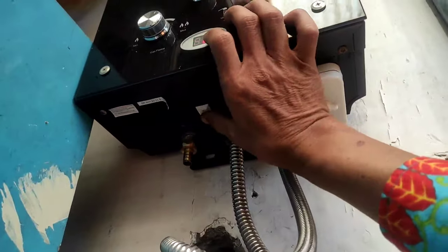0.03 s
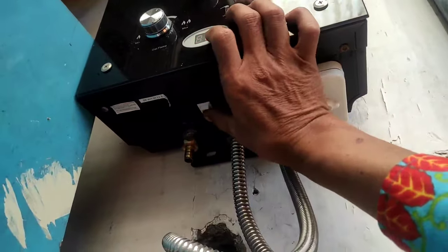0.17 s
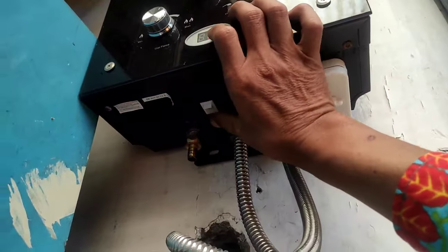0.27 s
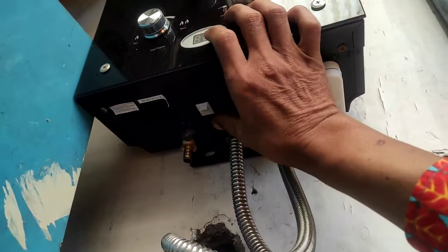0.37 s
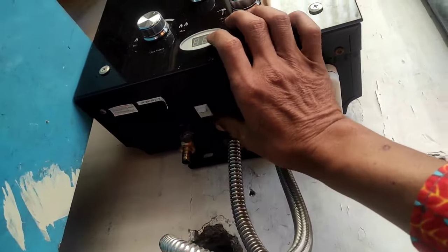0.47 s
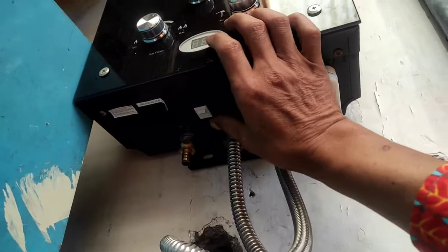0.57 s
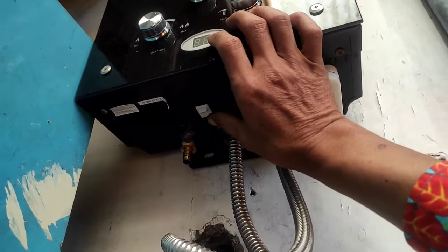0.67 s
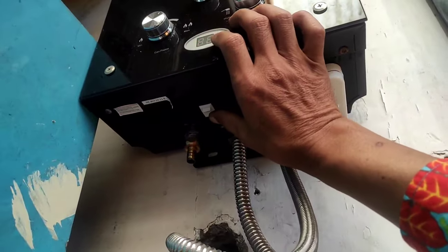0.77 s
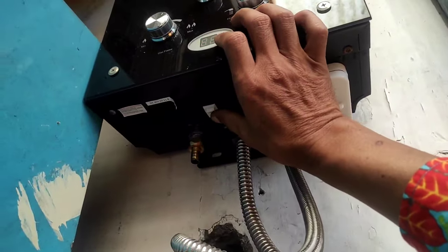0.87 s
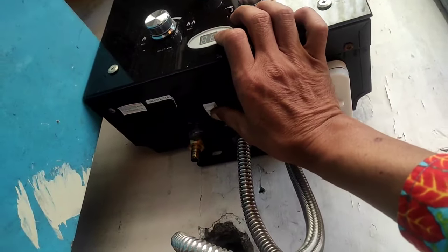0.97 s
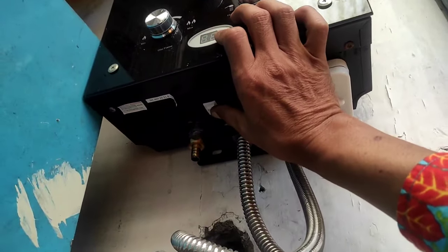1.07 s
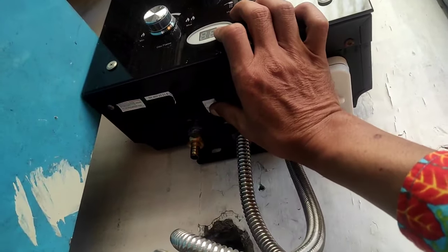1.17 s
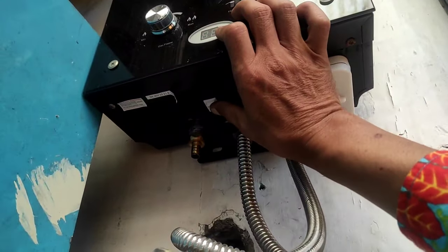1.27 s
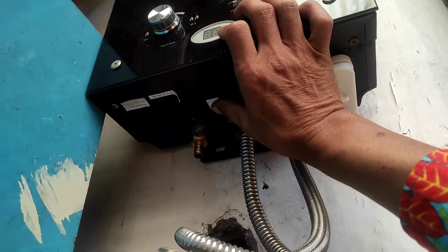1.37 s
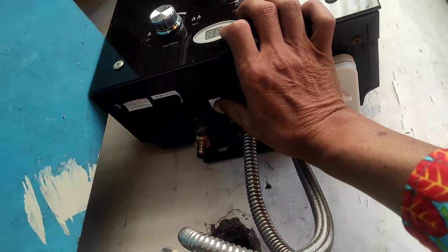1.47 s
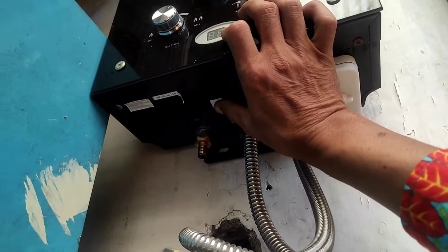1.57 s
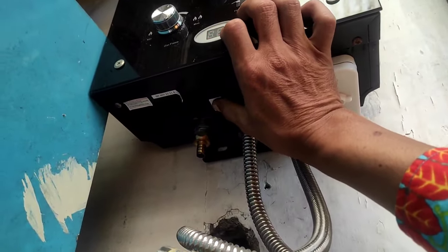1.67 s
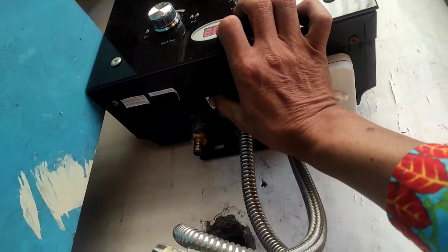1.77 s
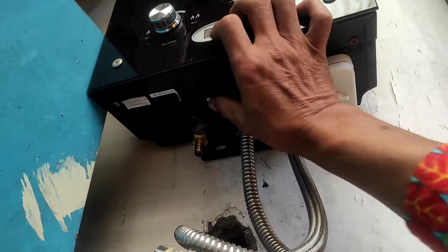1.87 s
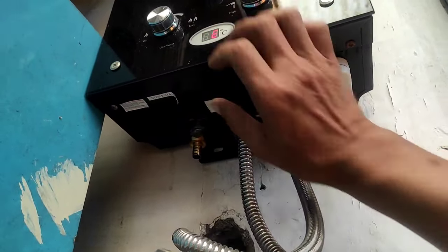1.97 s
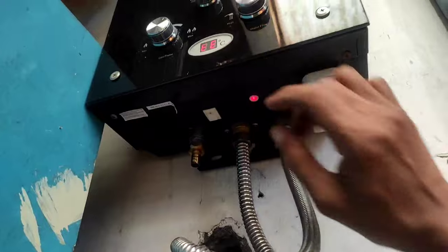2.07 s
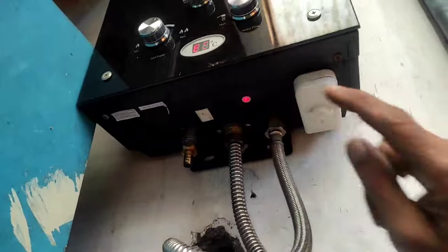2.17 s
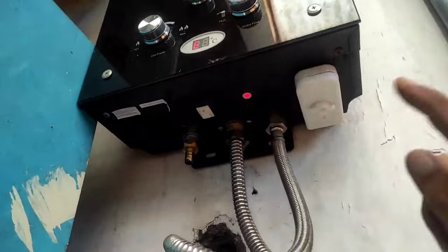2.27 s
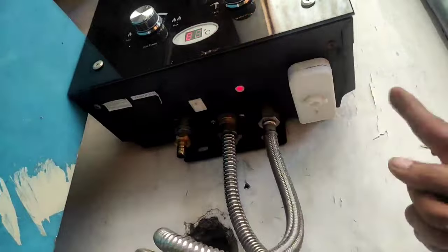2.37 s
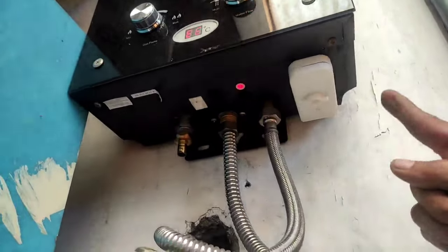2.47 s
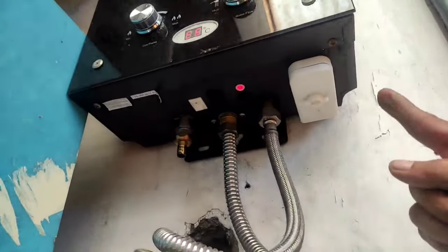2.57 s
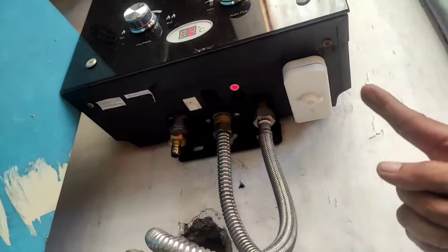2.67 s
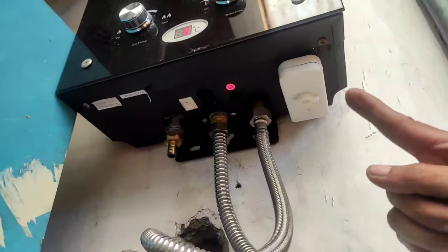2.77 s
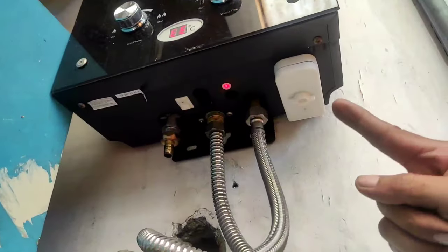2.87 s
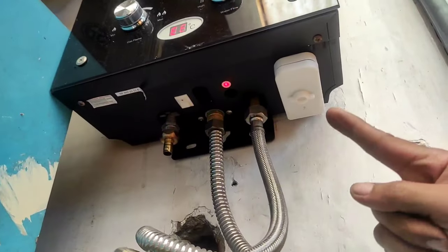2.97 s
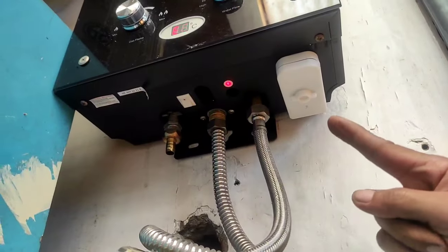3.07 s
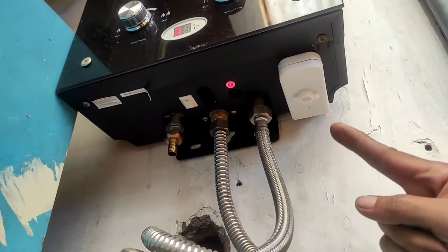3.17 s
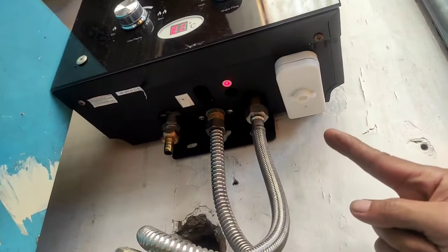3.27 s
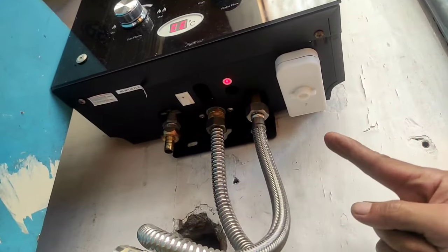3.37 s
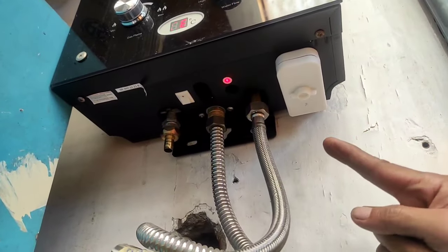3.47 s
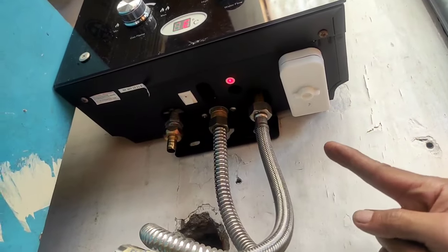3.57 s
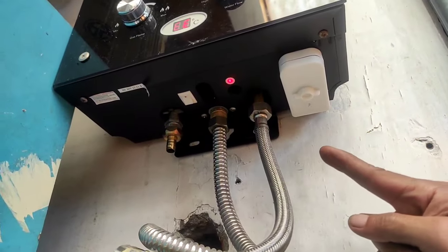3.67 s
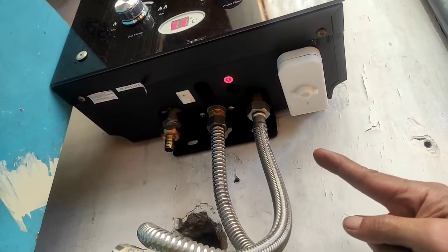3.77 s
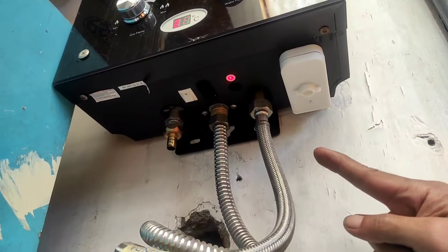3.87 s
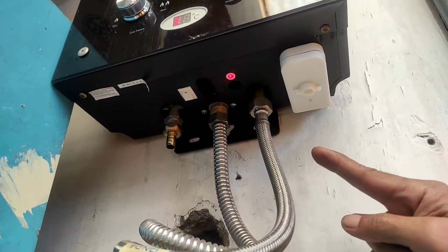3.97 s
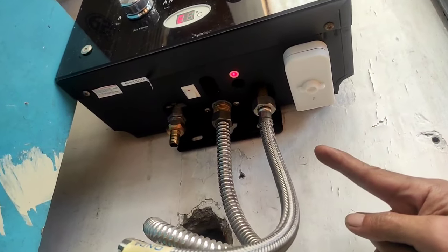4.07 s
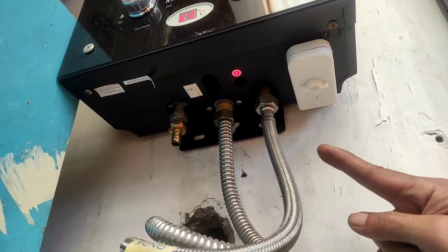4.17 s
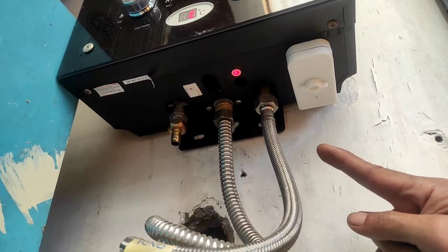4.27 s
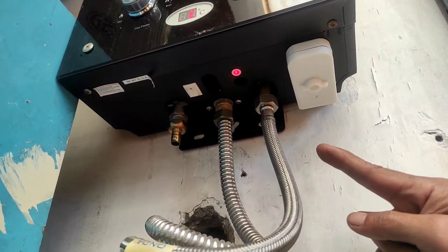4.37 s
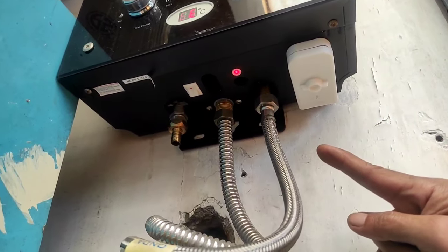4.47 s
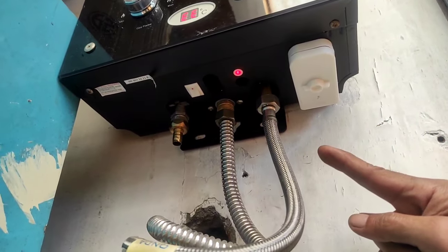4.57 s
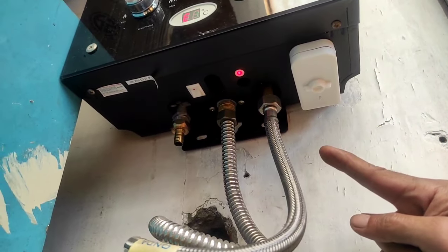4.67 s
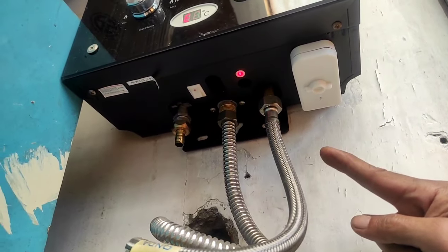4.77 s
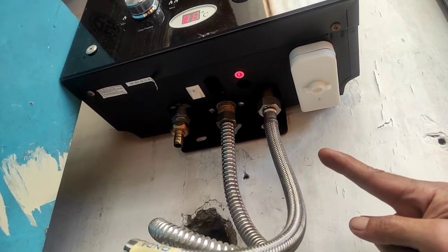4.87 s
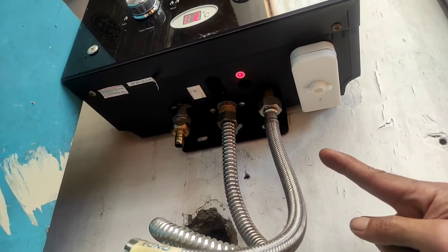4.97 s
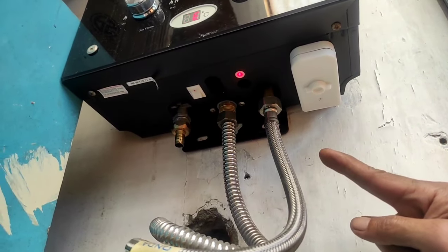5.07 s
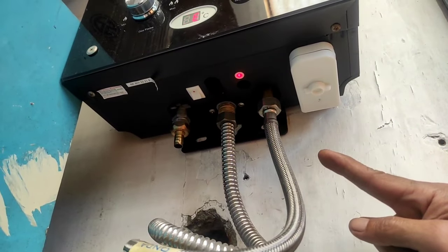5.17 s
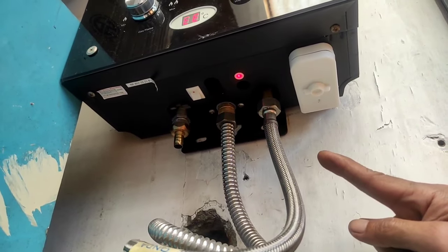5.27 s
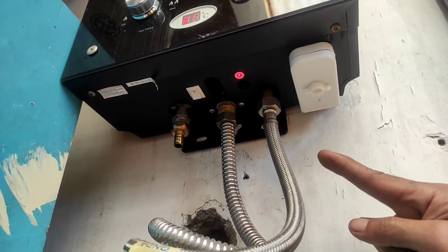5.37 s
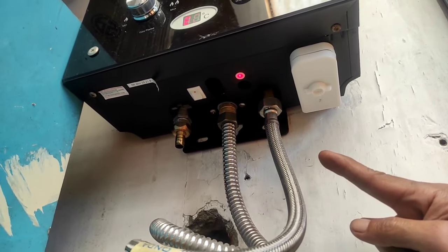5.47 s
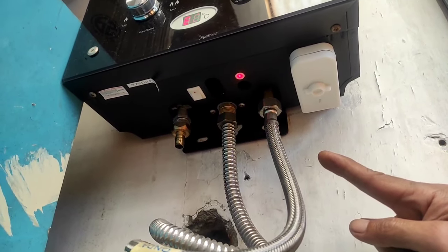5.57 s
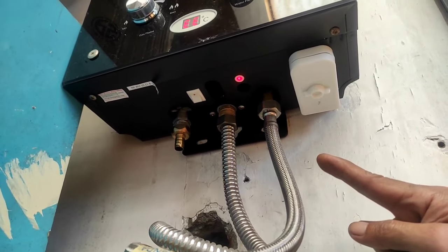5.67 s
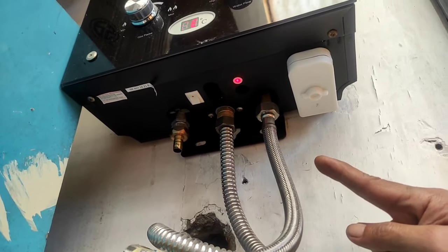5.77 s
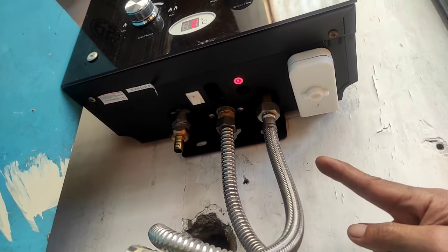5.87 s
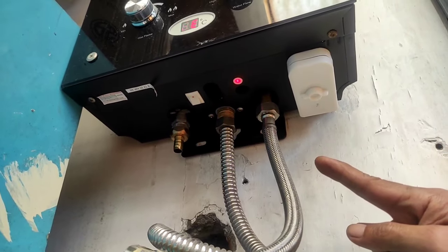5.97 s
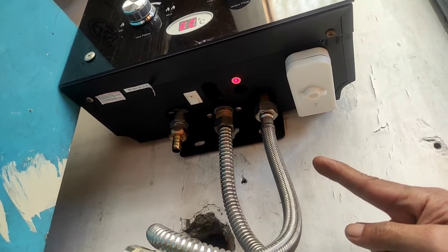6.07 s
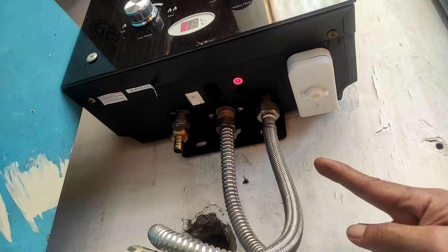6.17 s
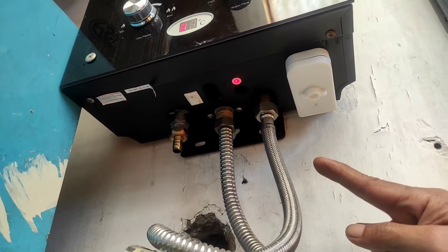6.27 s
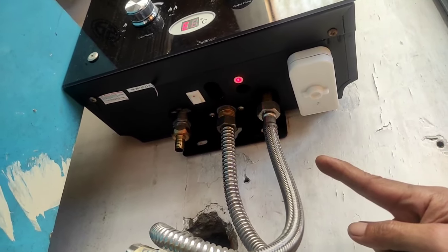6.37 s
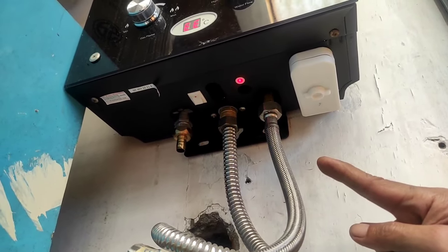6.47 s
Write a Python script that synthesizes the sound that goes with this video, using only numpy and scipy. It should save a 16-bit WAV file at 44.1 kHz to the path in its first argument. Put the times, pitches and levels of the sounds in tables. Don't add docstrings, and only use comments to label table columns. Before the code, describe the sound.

An indoor workshop hums low, with a deep distant machinery rumble strongest at the start and easing by about 1.2 seconds, and a steady airy hiss with faint duct tones. At 0.06 seconds a rocker switch snaps off, loud and close, with a tiny bounce and short room tail. Only the background remains until 1.69, when the switch clacks on with a double contact. From 1.74, igniter sparks tick about fourteen times a second: dry, bright, nearly identical snaps with a short high steel ring. At 2.2 a solenoid valve clacks hard and metallic; the next spark is weaker and the ticking slows to about ten a second until 2.7. It then regains its fast, even pace and continues to the end at about 6.5, with no ignition. The close hand-held stereo microphone adds a slight high, whistly edge, and rumble swells a little near 6.1.

```python
import sys
import numpy as np
from scipy import signal
from scipy.fft import rfft, irfft, next_fast_len
from scipy.io import wavfile
from scipy.ndimage import map_coordinates

SR = 44100
rng = np.random.default_rng(int(sys.argv[2]) if len(sys.argv) > 2 else 0)


def unload_audio(sound):
    columns = np.transpose(np.atleast_2d(sound))
    steps = np.round(np.clip(columns, -1, 1) * 32767)
    wavfile.write(sys.argv[1], SR, steps.astype(np.int16))


def volts_from_decibels(level):
    exponent = np.asarray(level, float) / 20
    return 10 ** exponent


N = 287973


def unit(x):
    return x / np.sqrt(np.mean(x ** 2) + 1e-20)


def along(points, hz):
    f, v = np.transpose(points)
    return np.interp(np.log(hz + 1), np.log(f + 1), v)


def filtered(x, response):
    size = next_fast_len(N + SR // 2)
    hz = np.fft.rfftfreq(size, 1 / SR)
    return irfft(rfft(x, size) * response(hz), size)[..., :N]


def coloured(x, spectrum):
    size = 2048
    level_db = np.maximum(along(spectrum, np.fft.rfftfreq(size, 1 / SR)), -70)
    cepstrum = irfft(np.log(volts_from_decibels(level_db)))
    fold = np.r_[1, np.full(size // 2 - 1, 2), 1, np.zeros(size // 2 - 1)]
    kernel = irfft(np.exp(rfft(cepstrum * fold)))
    kernel = kernel / np.linalg.norm(kernel)
    return signal.fftconvolve(x, kernel[None], axes=1)[:, :x.shape[1]]


def peaks(modes):
    return lambda f: np.sqrt(sum(volts_from_decibels(2 * db) / (1 + (2 * (f - c) / w) ** 2) ** 2 for c, w, db in modes))


def fade(t, t60, rise):
    t = np.maximum(t, 0)
    return volts_from_decibels(-60 * t / t60) * (1 - np.exp(-t / abs(rise)))


def direct(t, delay, db):
    return volts_from_decibels(db) * np.exp(-((t - delay) * SR / .7) ** 2)


def stereo_gain(db, balance_db):
    return volts_from_decibels(db + balance_db * np.array([[.5], [-.5]]))


def add(track, sound, s):
    part = track[:, round(s * SR):][:, :sound.shape[1]]
    part += sound[:, :part.shape[1]]


def wobble(rate):
    return map_coordinates(rng.standard_normal(40), [np.arange(N) * rate / SR], mode="mirror")


# (frequency [Hz], left-right likeness [0-1])
LIKENESS = [(60, 0.98), (180, 0.95), (550, 0.55), (1650, 0.13), (4970, 0.014), (15000, 0.08)]


def wash(gain):
    def mid_side(hz):
        turn = np.arccos(np.clip(along(LIKENESS, hz), -1, 1)) / 2
        return gain(hz) * np.array([np.cos(turn), np.sin(turn)])

    mid, side = filtered(rng.standard_normal((2, N)), mid_side)
    return unit(np.array([mid + side, mid - side]))


# (time [s], level [dB])
RUMBLE_SWELL = [(0, 7), (.3, 5.5), (1.2, -1), (2.5, -1), (5.2, -0.5), (6.15, 1), (6.53, -1)]


def swell_db():
    return np.interp(np.arange(N) / SR, *np.transpose(RUMBLE_SWELL))


# (frequency [Hz], width [Hz], level [dB])
ROOM_MODES = [(147.5, 18.7, 0), (178.7, 26, -2), (216, 23, -9.5), (246.3, 34, -15), (351.4, 97, -21)]


def drone(load_db):
    level_db = -43 + 0.13 * load_db + .5 * wobble(2.51)
    return volts_from_decibels(level_db) * wash(peaks(ROOM_MODES))


# (frequency [Hz], width [Hz], level [dB])
RUMBLE_MODES = [(27, 53, -7), (57, 39, -7.5), (96, 74, -5.5)]


def rumble(load_db):
    level_db = -48 + load_db + 1.2 * wobble(2.31)
    return volts_from_decibels(level_db) * wash(peaks(RUMBLE_MODES))


# (frequency [Hz], level per Hz [dB])
AIR_COLOUR = [(150, -26), (260, -2.5), (400, -8), (800, -10.5), (2400, -9), (4300, -20), (5500, -21),
              (6600, -20.5), (7750, -7), (9200, -22.5), (10000, -28), (10700, -36.5), (15000, -37),
              (15500, -70)]
# (frequency [Hz], width [Hz], level [dB])
DUCT_MODES = [(780, 15, 8.5), (1014, 170, -1), (1106.4, 32, 9), (1584, 43, -10.5)]


def air(load_db):
    level_db = -46.5 + 0.12 * load_db + .3 * wobble(1.76)
    hiss = wash(lambda hz: volts_from_decibels(along(AIR_COLOUR, hz)) * (1 + 0.96 * peaks(DUCT_MODES)(hz)))
    return volts_from_decibels(2.5) * volts_from_decibels(level_db) * hiss


def shop():
    load_db = swell_db()
    return drone(load_db) + rumble(load_db) + air(load_db)


# (time [s], peak level [dB], left-right difference [dB])
CLICK_EVENTS = [
    (0.061, -1, 0),
    (1.687, 0, 2.5),
    (2.198, -5, 4),
]
# (delay [s], level [dB])
BOUNCES = [
    [(.006, -4), (.011, -10)],
    [(.011, -4), (.019, 3)],
    [(.003, 15.5), (.007, -15)],
]
# (frequency [Hz], level per Hz [dB])
CRACK_COLOURS = [
    [(120, -40), (200, 0.5), (570, -41), (1110, 6.5), (1540, -19), (2820, -7), (3650, -27), (4560, -9),
     (7210, 4), (9330, -11), (10800, -23), (16200, -39)],
    [(120, -21), (200, -9), (550, -24.5), (1090, -10), (1600, -35), (2140, -16), (4230, -34), (7480, 4),
     (8990, -7.5), (11000, -32), (15100, -30), (16200, -53)],
    [(120, -55), (200, -20), (698, -29), (1190, -18), (2030, 3), (2980, 1), (3790, -18), (4900, -3.5),
     (6580, -1), (8670, -0.5), (13700, -27), (16200, -61)],
]
# (frequency [Hz], level per Hz [dB])
TAIL_COLOURS = [
    [(120, -27), (200, -21), (335, 7), (449, -23), (530, 0), (592, 0), (3790, -5), (7210, 2),
     (10000, -12.5), (10600, -38), (15100, -29), (16200, -75)],
    [(120, -40), (200, -25), (360, 4.5), (570, -14), (839, -5), (3270, -16), (4230, -11), (7760, -6.5),
     (8990, 0.5), (10200, -60), (14800, -35), (16200, -67)],
    [(120, -49), (200, -18), (972, -12.5), (2220, 0.5), (3330, -6), (4230, -21), (4470, -17), (6110, -7),
     (9160, -15), (10800, -28), (14200, -19), (16200, -89)],
]
# (frequency [Hz], level [dB], t60 [s])
PANEL_MODES = [
    [(332.4, -2.5, 0.19), (1132, -1, 0.23), (2767, -24, 0.42), (3020, -13, 0.18), (3208, -31, 1.0)],
    [(317, 1, 0.28), (1130, -0.5, 0.13), (1970, -44, 4.6), (3208, -5.5, 0.15), (3470, -40, 5.0)],
    [(1530, -11.5, 0.38), (2140, -9, 0.45), (3090, -10.5, 0.35), (2960, -5, 0.18), (6080, 3.5, 0.14),
     (6300, -16, 0.27), (6500, -23, 0.29), (6850, -23, 0.47)],
]
# (crack t60 [s], tail level [dB], tail t60 [s], panel level [dB])
CLICK_BODIES = [
    (0.046, -17.5, 0.27, -24),
    (0.095, -18, 0.28, -26),
    (0.078, -13, 0.36, -14.5),
]


def clicks():
    out = np.zeros((2, N))
    t = np.arange(SR // 2) / SR
    rows = zip(CLICK_EVENTS, BOUNCES, CRACK_COLOURS, TAIL_COLOURS, PANEL_MODES, CLICK_BODIES)
    for (s, db, balance_db), bounces, crack_colour, tail_colour, modes, body in rows:
        crack_t60, tail_db, tail_t60, panel_db = body
        noise = wash(np.ones_like)
        crack_noise, tail_noise = noise[:, :len(t)], noise[:, len(t):2 * len(t)]
        blows = volts_from_decibels(2.5) * fade(t, crack_t60, 0.00044)
        for delay, bounce_db in bounces:
            blows = blows + volts_from_decibels(bounce_db) * fade(t - delay, 0.011, 0.0026)
        crack = blows * crack_noise + direct(t, 0.001014, 9)
        sound = volts_from_decibels(-8.0) * coloured(crack, crack_colour)
        sound += volts_from_decibels(tail_db) * coloured(fade(t, tail_t60, 0.0063) * tail_noise, tail_colour)
        for hz, level_db, t60 in modes:
            phase = rng.uniform(0, 2 * np.pi) + rng.normal(0, 1.0, (2, 1))
            ring = fade(t, t60, 0.0047) * np.sin(2 * np.pi * hz * t + phase)
            sound += volts_from_decibels(panel_db + level_db) * ring
        add(out, stereo_gain(db, balance_db) * sound, s)
    return out


# (first spark [s], gap [s], number of sparks)
SPARK_RUNS = [
    (1.7439, .07102, 7),
    (2.2598, .0972, 1),
    (2.357, .09803, 4),
    (2.7344, .07125, 18),
    (4.0169, .07107, 36),
]
# (time [s], width [s], level [dB])
SUPPLY_DIP = (2.26, 0.041, -5)
# (time [s], level [dB], left-right difference [dB])
HAND_SHADE = [(1.74, -2.5, 2.5), (2.1, -1.8, 1), (2.36, -0.6, 0.5), (3.1, -0.4, .1), (4.6, -1.1, -0.5),
              (6.5, -0.74, 0.8)]


def sparks():
    s = np.concatenate([first + gap * np.arange(count) for first, gap, count in SPARK_RUNS])
    luck = rng.standard_normal((len(s), 4))
    at, shade_db, balance_db = np.transpose(HAND_SHADE)
    dip_s, dip_width_s, dip_depth_db = SUPPLY_DIP
    dip_db = dip_depth_db * np.exp(-((s - dip_s) / dip_width_s) ** 2)
    scatter_db = 0.43 * luck[:, 0]
    db = -15 + np.interp(s, at, shade_db) + dip_db + scatter_db
    low_db = -19.5 - 2 * (luck[:, 1] ** 2 + luck[:, 2] ** 2) / 2
    jitter_s = .0002 * luck[:, 3]
    return zip(s + jitter_s, db, low_db, np.interp(s, at, balance_db))


# (frequency [Hz], level [dB])
STEEL_MODES = [(6019, -62), (6368, -61), (6578, -59), (6831, -57), (7144, -55), (7284, -56), (7607, -48),
               (7833, -57), (8043, -57), (8269, -52), (8463, -50), (8802, -51), (9238, -54), (9421, -57)]


def casing_ring(t, late):
    hz, mode_db = np.transpose(STEEL_MODES)[:, :, None, None]
    phase = rng.uniform(0, 2 * np.pi, (len(STEEL_MODES), 2, 1))
    ring = np.sum(volts_from_decibels(mode_db - mode_db.max()) * np.sin(2 * np.pi * hz * t + phase), axis=0)
    return volts_from_decibels(-9.5) * ring * fade(late, .075, 0.00089)


# (frequency [Hz], level per Hz [dB])
SNAP_COLOUR = [(880, -19), (1500, -23), (2650, -14), (3170, -62.5), (4220, -18.5), (4570, -15.5),
               (7020, -2.5), (7450, -1.5), (8570, 7), (9850, -7.5), (10300, -11), (14800, -15),
               (16300, -33), (16800, -55)]
# (frequency [Hz], level per Hz [dB])
ANSWER_COLOUR = [(880, -40.5), (1500, 6), (1640, -32), (2280, -2.5), (3010, -1), (5050, -7.5), (5310, -6),
                 (7300, 4.5), (8570, 7), (10600, -11.5), (14700, -7.5), (15600, -13), (16200, -73)]


def igniter():
    snap, low, answer, steel = np.zeros((4, 2, N))
    t = np.arange(SR // 4) / SR
    late = t - np.array([[0.], [.0006]])
    paths = rng.standard_normal((2, 2, len(t)))
    ring = casing_ring(t, late)
    fresh_share, drift_per_s = .3, .25
    for s, db, low_db, balance_db in sparks():
        turn = drift_per_s * s
        same = np.cos(turn) * paths[0] + np.sin(turn) * paths[1]
        echo = 0.91 * same + fresh_share * rng.standard_normal(same.shape)
        size = stereo_gain(db, balance_db)
        first = volts_from_decibels(-1.5) * fade(late - .0007, 0.022, 0.00022)
        add(snap, size * (echo * first + direct(late, 0.001, 11.7)), s)
        add(low, size * volts_from_decibels(low_db + 8.0) * echo * fade(t, 0.026, 0.00077), s)
        add(answer, size * volts_from_decibels(-18.0) * echo * fade(late, 0.28, 0.0045), s)
        add(steel, size * ring, s)
    crackle_colour = [(1500, -50.5), (2600, 7.5), (3600, 13.5), (4400, 20.0), (6000, -23.0)]  # (Hz, dB)
    sound = volts_from_decibels(2.5) * coloured(snap, SNAP_COLOUR) + coloured(low, crackle_colour)
    return sound + coloured(answer, ANSWER_COLOUR) + steel


def scene():
    return shop() + clicks() + igniter()


# (frequency [Hz], left-right difference [dB])
PORT_BALANCE = [(100, 6), (400, 2.5), (1300, 3.5), (2500, -2), (5000, 0), (6100, -5.5), (7500, -10),
                (8300, -2.5), (9200, 11), (10200, -4.5), (15000, 2)]


def microphone_ports(dry):
    heard = filtered(dry, lambda hz: stereo_gain(0, along(PORT_BALANCE, hz)))
    return np.clip(heard, -1, 1)


def roll_off(x):
    return signal.sosfilt(signal.butter(12, 16350, fs=SR, output="sos"), x)


def record(dry):
    mix = microphone_ports(dry)
    return roll_off(mix)


dry = scene()
out = record(dry)
unload_audio(out)
```